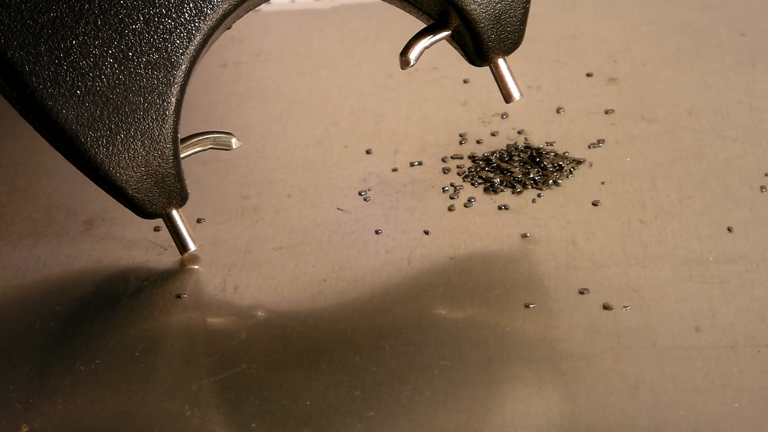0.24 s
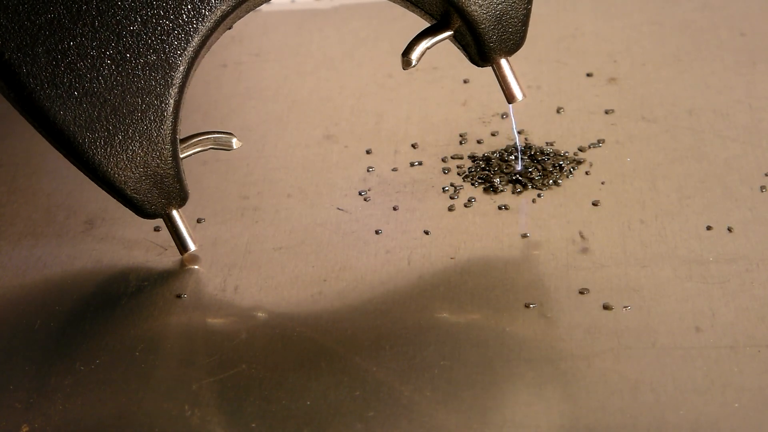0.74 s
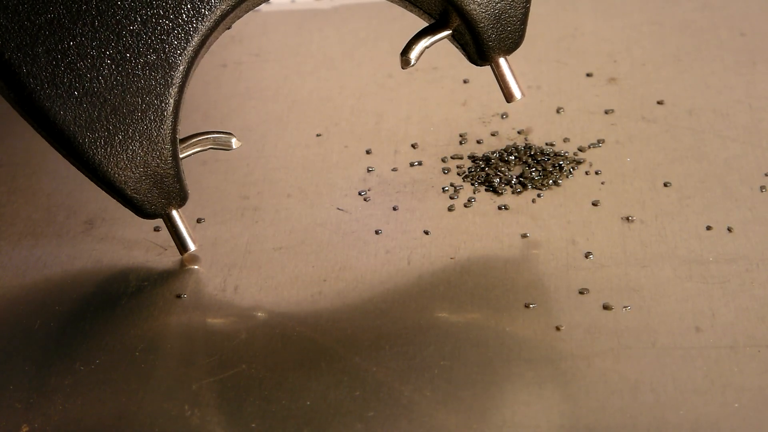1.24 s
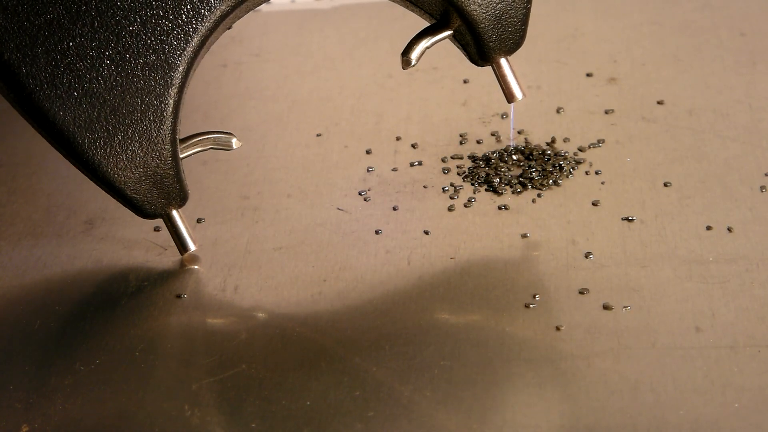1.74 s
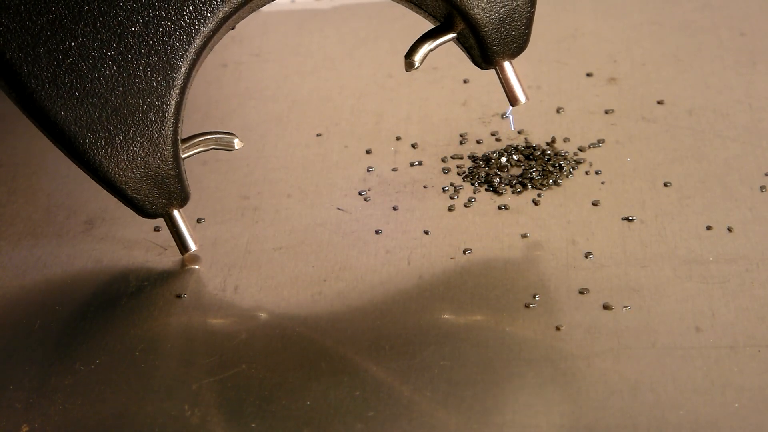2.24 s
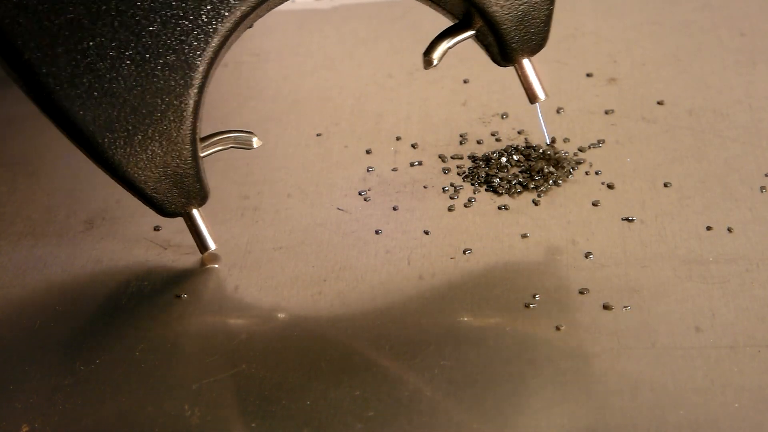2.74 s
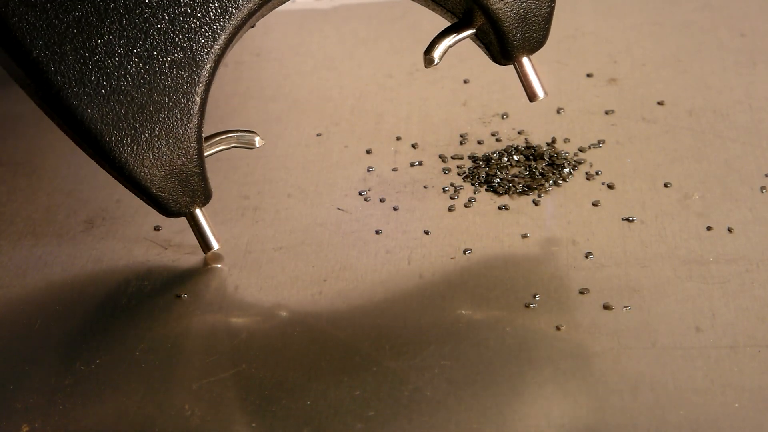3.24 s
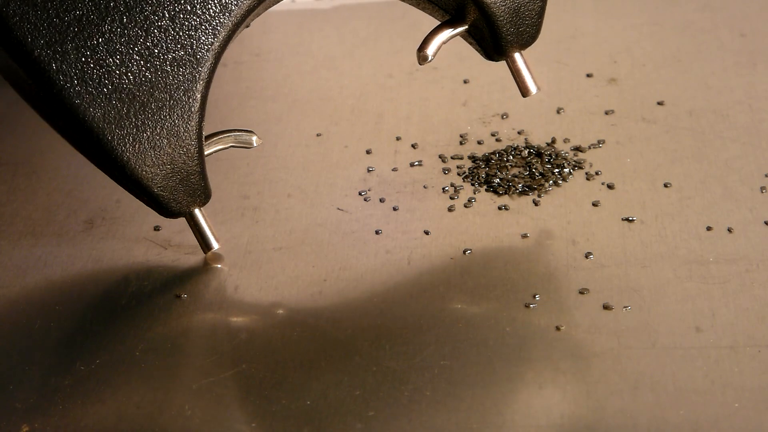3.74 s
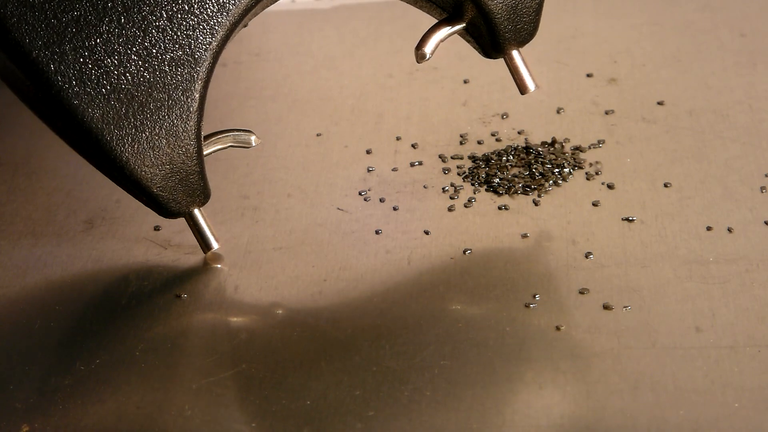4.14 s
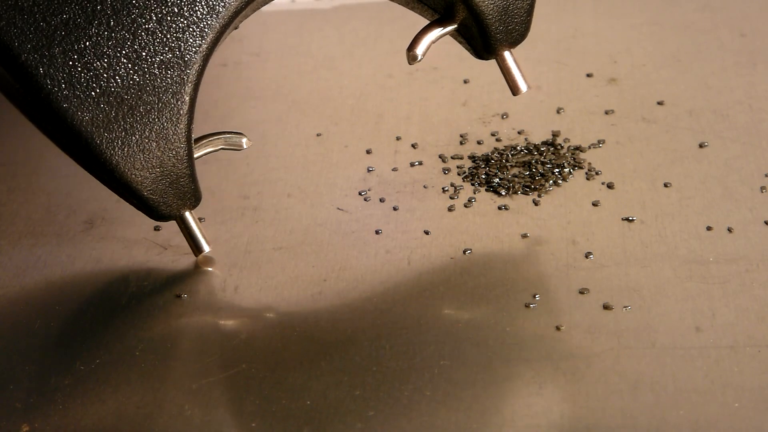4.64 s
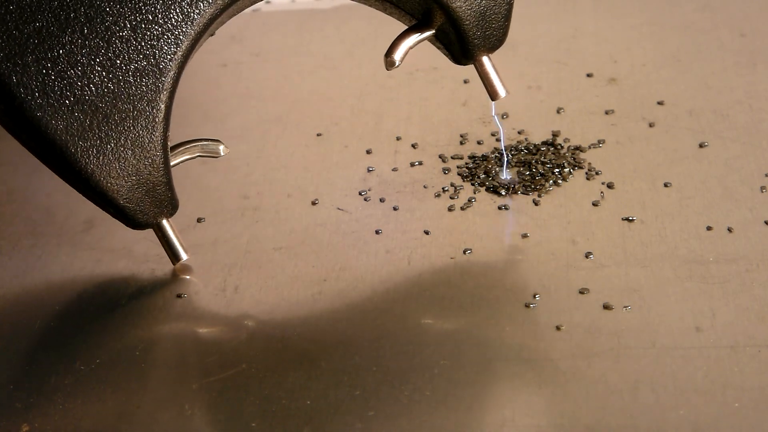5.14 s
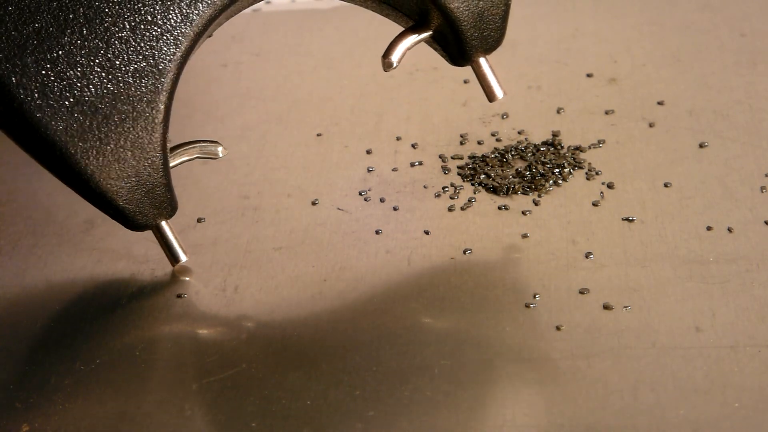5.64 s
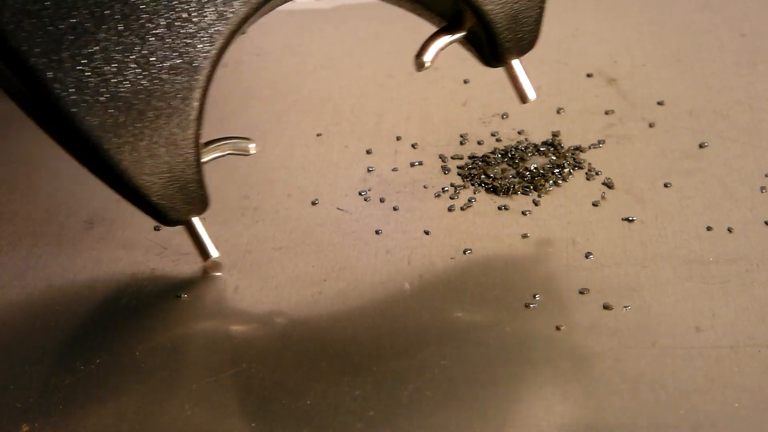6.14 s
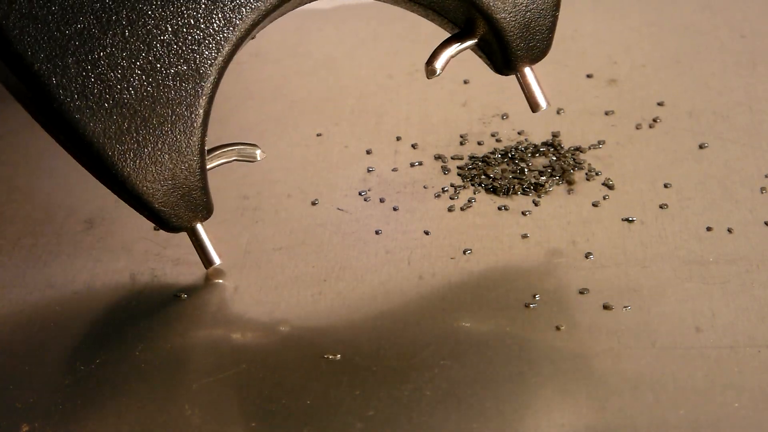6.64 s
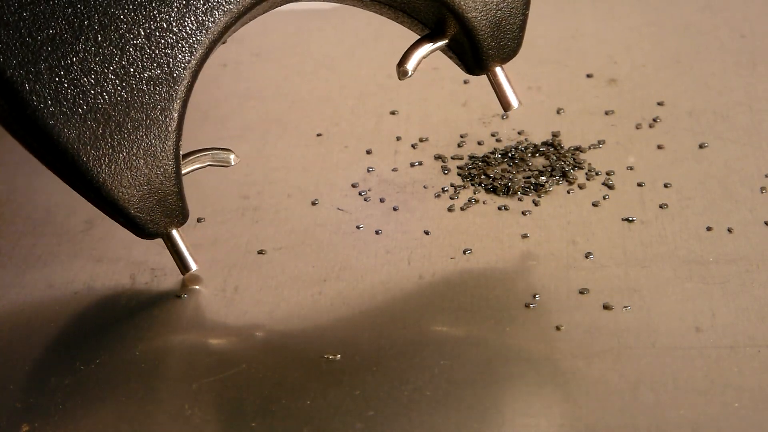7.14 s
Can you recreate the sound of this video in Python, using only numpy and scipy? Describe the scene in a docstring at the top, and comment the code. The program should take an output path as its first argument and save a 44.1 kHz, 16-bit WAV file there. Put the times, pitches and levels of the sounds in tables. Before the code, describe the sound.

Rapid, hard electric cracks come from a stun gun sparking into powder, heard close up in stereo in a small room. The snaps run without a break at roughly eight a second, slowing slightly toward the end, each slightly clipped and followed by a quick echo. A barely audible high recharging whine, soft low ticks and a light hiss lie beneath them.

```python
"""A stun gun arcs into a pinch of powder on a table, close to a stereo microphone in a small room.
About eight times a second its capacitor's charge jumps the gap with a sharp snap, louder after a
longer wait. In between, the converter whines upward; faint low ticks and hiss lie underneath.
Gun and microphone hardly move, so each snap takes much the same paths: nearby surfaces, one hard
echo from a metre away, then the room. The first crack of each snap overloads the recorder."""
import sys
import numpy as np
from scipy import signal
from scipy.fft import rfft, irfft, next_fast_len
from scipy.io import wavfile

SR = 44100
rng = np.random.default_rng(int(sys.argv[2]) if len(sys.argv) > 2 else 0)


def wav_out(sig):
    """Save sig, one row per channel (or a flat mono array), as 16-bit PCM at SR to the path in sys.argv[1]."""
    wavfile.write(sys.argv[1], SR, np.round(np.clip(np.atleast_2d(sig).T, -1, 1) * 32767).astype(np.int16))


N = 326781
TOP_HZ = 11620  # the recorder's upper band edge

# steady noise of room and microphone: (frequency [Hz], relative level [dB])
NOISE_COLOUR = [(25, 1), (60, -3), (150, -14.5), (400, -15.5), (1000, -13.5), (2500, -1.5), (7000, -3.5),
                (11000, -5)]
# the converter's whine at full charge: (time [s], pitch [Hz], level [dB])
FULL_CHARGE_WHINE = [(0, 7140, -60), (3.5, 7220, -60), (6.2, 7290, -57), (7.3, 7300, -52)]
# colour of what the room returns to the microphone: (frequency [Hz], relative level [dB])
ROOM_COLOUR = [(100, -15), (300, -15), (520, -17), (720, -10), (1200, -5), (1700, -2.4), (2400, 2.7),
               (3500, 1.8), (5000, 2.6), (7000, 4.7), (9000, 3.3), (11300, 2.1)]
# how fast the room dies away: (frequency [Hz], time to fall 60 dB [s])
ROOM_T60 = [(300, .3), (1500, .29), (4000, .27), (11000, .24)]
# likeness of the room sound in the two channels: (frequency [Hz], correlation [-1 to 1])
ROOM_CORRELATION = [(300, -.3), (900, .7), (1700, .55), (3000, .25), (9000, .05)]
# broad colour of the snap, close up: (frequency [Hz], left gain [dB], right gain [dB])
SNAP_COLOUR = [(102.6, -30, -16.5), (373, -4.5, -4), (526, -19, -20), (708, -7.5, -6), (965, -13.5, 7.5),
               (1390, -15, 3), (2020, -10.5, 6.5), (2330, -7, 17), (3740, 4.5, 10), (4890, -4.5, 7),
               (6230, 1.5, 7), (7000, 10, 13.5), (8060, 14.5, 10), (8720, 6, 12.5), (11160, 6.5, 7)]
# narrow resonances of the space between gun, table and microphone:
# (frequency [Hz], width [Hz], left gain [dB], right gain [dB])
RESONANCES = [(720, 110, 5, 6), (1700.0, 130.0, 4.5, 9.7), (2440.0, 130.0, 5.1, 6),
              (2720.0, 130.0, 5.2, -3.4), (2960.0, 130.0, 5.4, 5.2), (3240.0, 220.0, 1, 6),
              (4260.0, 220.0, 5.7, 7.5), (4580.0, 130.0, 3.1, 2.8), (5060.0, 130.0, -1.9, 5.9),
              (5335.0, 130.0, 1.3, 12.9), (5660.0, 130.0, 0.0, 5.4), (5820.0, 220.0, 6.6, -1.8),
              (6100.0, 220.0, 9.5, 7.8), (7300.0, 130.0, -1.9, 5.2), (7660.0, 220.0, -1.3, 7.1),
              (8160.0, 130.0, -5.3, 4.0), (8320.0, 220.0, 5, 3), (8660.0, 130.0, -2, 5),
              (8880.0, 220.0, 5, 0.1), (9560.0, 130.0, 5.4, 7.8), (10340.0, 350.0, 7.0, 9.4)]
# moments at which the gap breaks down: (time [s])
BREAKDOWNS = [0.08, 0.1944, 0.3079, 0.4238, 0.548, 0.6657, 0.7844, 0.9029, 1.024, 1.14, 1.2578, 1.4011,
              1.5241, 1.6508, 1.7709, 1.8932, 2.0145, 2.137, 2.2698, 2.3931, 2.5153, 2.65, 2.7718, 2.8958,
              3.0443, 3.1686, 3.2945, 3.44, 3.5862, 3.7326, 3.8629, 3.989, 4.1138, 4.2422, 4.3705, 4.4963,
              4.624, 4.7745, 4.921, 5.0586, 5.1847, 5.3145, 5.4411, 5.5892, 5.7166, 5.8501, 5.9781, 6.1165,
              6.246, 6.3776, 6.5187, 6.6556, 6.817, 6.948, 7.0787, 7.248, 7.4007]
# strength of the arc as it wanders over the powder, after a usual wait: (time [s], gain [dB])
ARC_STRENGTH = [(0.08, 1.0), (0.78, -2.5), (2.9, -1.2), (3.04, -4), (3.44, -3), (3.73, -2.5), (3.99, 2.2),
                (6.12, 1), (6.25, -3.5), (6.52, 0.3), (6.82, -1.3), (6.95, 2.5), (7.08, -5), (7.25, -0.24)]
# the hand-held gun drifts, tilting its reflections sideways: (time [s], left minus right [dB])
HAND_DRIFT = [(0, -.8), (3.2, -1.8), (3.7, -0.3), (5.3, -0.1), (6.2, -3), (7.3, -2)]


def amp(db):
    """Decibels to gain."""
    return 10 ** (np.asarray(db) / 20)


def unit_energy(x):
    """Each channel scaled to an energy of 1."""
    return x / np.linalg.norm(x, axis=-1, keepdims=True)


def along(points, hz):
    """The value columns of a table, read on a log frequency axis."""
    f, *columns = np.transpose(points)
    return np.array([np.interp(np.log(hz + 1), np.log(f + 1), c) for c in columns])


def filtered(x, gain):
    """x times a gain that depends on frequency."""
    n = x.shape[-1]
    size = next_fast_len(n + SR // 10)
    return irfft(rfft(x, size) * gain(np.fft.rfftfreq(size, 1 / SR)), size)[..., :n]


def minimum_phase(gain, size=8192):
    """The tightest impulse response that has a given colour."""
    cepstrum = irfft(np.log(gain(np.fft.rfftfreq(size, 1 / SR)) + 1e-6))
    fold = np.r_[1, np.full(size // 2 - 1, 2), np.zeros(size // 2)]
    return irfft(np.exp(rfft(cepstrum * fold)))


def in_band(hz):
    """The recorder's steep upper band edge."""
    return 1 / (1 + (hz / TOP_HZ) ** 100)


def firings():
    """The spark times; the gun is already firing, so one more lies a period before the first."""
    times = np.sort(np.ravel(BREAKDOWNS))
    return np.r_[2 * times[0] - times[1], times]


def room_tone(level_db=-46.5):
    """Faint hiss and rumble of room and microphone."""
    colour = lambda hz: amp(along(NOISE_COLOUR, hz)) * (hz < TOP_HZ)
    hiss = filtered(rng.standard_normal((2, N)), colour)
    return amp(level_db) * np.sqrt(N) * unit_energy(hiss)


def low_ticks(lags_s=(.072, .107), spread_s=.006, corner_hz=500):
    """A pair of faint, dull ticks follows each spark, mostly in the right channel."""
    fired = firings()[:, None]
    times = fired + lags_s + spread_s * rng.standard_normal(fired.shape)
    samples = np.maximum(np.round(times * SR).astype(int).ravel(), 0)
    impulses = amp(-14) * np.bincount(samples, minlength=N)[:N]
    ticks = filtered(impulses, lambda hz: np.exp(-.5 * (hz / corner_hz) ** 2))
    return np.outer([-.35, 1], ticks)


def converter_whine(sag_hz=650, jitter_hz=400, charge_s=.045, empty_db=-16):
    """Each spark empties the capacitor; the whine climbs back in pitch and strength as it refills."""
    t = np.arange(N) / SR
    fired = firings()
    since_spark = t - fired[np.searchsorted(fired, t) - 1]
    empty = np.exp(-since_spark / charge_s)
    times, full_hz, full_db = np.transpose(FULL_CHARGE_WHINE)
    pitch = np.interp(t, times, full_hz) - sag_hz * empty + jitter_hz * rng.standard_normal(N)
    rms = amp(np.interp(t, times, full_db) + empty_db * empty)
    return np.sqrt(2) * rms * np.sin(2 * np.pi * np.cumsum(pitch) / SR)


def room_tail(t, delay_s=.007, rise_s=.0015):
    """The small room's dense reflections; the treble dies a little sooner than the bass."""
    hz, age, noise = signal.stft(rng.standard_normal((2, len(t))), SR, nperseg=256)
    width_angle = np.arccos(np.clip(along(ROOM_CORRELATION, hz)[0], -1, 1)) / 2
    colour = amp(along(ROOM_COLOUR, hz)) * [np.cos(width_angle), np.sin(width_angle)]
    decay = amp(-60 * age / along(ROOM_T60, hz).T)
    mid, side = signal.istft(noise * colour[:, :, None] * decay, SR, nperseg=256)[1][:, :len(t)]
    onset = 1 - np.exp(-np.maximum(t - delay_s, 0) / rise_s)
    return unit_energy(np.array([mid + side, mid - side]) * onset)


def resonance_db(hz):
    """The narrow resonances at the microphone's left and right port."""
    return sum(np.array([[left], [right]]) / (1 + (2 * (hz - centre) / width) ** 2)
               for centre, width, left, right in RESONANCES)


def snap_gain(hz):
    """The broad colour of the snap with the resonances on top."""
    return amp(along(SNAP_COLOUR, hz) + resonance_db(hz)) * in_band(hz)


def cluster(t, delay_s, t60_s, gain):
    """A dying cluster of random reflections that reaches the microphone after a delay."""
    age = t - delay_s
    envelope = (age > 0) * amp(-60 * np.abs(age) / t60_s)
    burst = envelope * rng.standard_normal((2, len(t)))
    return unit_energy(signal.fftconvolve(burst, minimum_phase(gain), axes=1)[:, :len(t)])


def wall_echo(t):
    """One hard surface about a metre away returns the snap, smeared, with some of its ring."""
    colour = lambda hz: amp(along(ROOM_COLOUR, hz) + resonance_db(hz) / 2) * in_band(hz)
    return cluster(t, delay_s=.0066, t60_s=.025, gain=colour)


def near_scatter(t):
    """Close to the microphone, the table and the gun's body scatter the crack, ringing briefly."""
    return cluster(t, delay_s=.0005, t60_s=.022, gain=snap_gain)


def blend_paths(steady, fresh, share):
    """Mostly the same paths through the air each time, with a share of the energy on new ones."""
    return np.sqrt(1 - share) * steady + np.sqrt(share) * fresh


def lead_pickup(t, out_s=.0003, back_s=.0016, width_s=.00024):
    """The discharge induces one low swing in the microphone leads, opposite in the two channels."""
    sizes = [-.054, .017] + .006 * rng.standard_normal(2)
    bump = lambda at: np.exp(-.5 * ((t - at) / width_s) ** 2)
    return np.outer(sizes, bump(out_s) - bump(back_s))


def crack(t):
    """The direct shock front; the microphone housing draws it out into a few cycles."""
    front = minimum_phase(snap_gain)[:, :len(t)]
    for centre_hz, width_hz in [(2900, 1700), (7700, 1900), (10300, 1200)]:
        poles = signal.iirpeak(centre_hz, width_hz, fs=SR)[1]
        front = signal.lfilter(poles[::-1], poles, front)  # all-pass: each cavity delays its own band
    left, right = front
    return np.array([np.pad(left, (2, 0))[:len(t)], right])  # the left port hears it a moment later


def spark_levels(fired, usual_wait_s=.14, db_per_doubling=7.5, spread_db=1.02):
    """Each spark's gain in dB, from the arc's strength, the time it had to charge, and chance."""
    wait = np.diff(fired, prepend=2 * fired[0] - fired[1])
    charge_db = db_per_doubling * np.log2(wait / usual_wait_s)
    arc_db = np.interp(fired, *np.transpose(ARC_STRENGTH))
    return arc_db + charge_db + spread_db * rng.standard_normal(len(fired))


def sparks(crack_db=-.58, scatter_db=5, echo_db=2, room_db=4):
    """The charge jumps the gap close to the microphone: a crack, then slightly varying reflections."""
    t = np.arange(SR // 2) / SR
    early = t[:SR // 40]
    reflections = lambda: amp(scatter_db) * near_scatter(early) + amp(echo_db) * wall_echo(early)
    direct = amp(crack_db) * crack(early)
    steady_early, steady_tail = reflections(), room_tail(t)
    out = np.zeros((2, SR + N + len(t)))  # a second of lead: the gun is already firing
    fired = firings()
    for time, spark_db in zip(fired, spark_levels(fired)):
        snap = amp(room_db) * blend_paths(steady_tail, room_tail(t), share=.38)
        snap[:, :len(early)] += blend_paths(steady_early, reflections(), share=.23)
        balance_db = np.interp(time, *np.transpose(HAND_DRIFT))
        snap *= amp([[balance_db / 2], [-balance_db / 2]])
        swing = amp(spark_db) * lead_pickup(early)  # scaled again below: grows twice as fast in dB
        snap[:, :len(early)] += direct + swing
        start = SR + round(time * SR)
        out[:, start:start + len(t)] += amp(spark_db) * snap
    return out[:, SR:SR + N]


def scene():
    """Sparks, a rising whine and faint low ticks between them, and quiet hiss."""
    return sparks() + converter_whine() + low_ticks() + room_tone()


def record(dry):
    """The narrow-band recorder flattens the tip of each crack and thins the deep bass."""
    ceiling, hardness, bass_hz = .76, 8, 100
    limited = filtered(dry, in_band)
    clipped = limited / (1 + np.abs(limited / ceiling) ** hardness) ** (1 / hardness)
    return filtered(clipped, lambda hz: in_band(hz) * 1j * hz / (bass_hz + 1j * hz))


dry = scene()
out = record(dry)
wav_out(out)
```